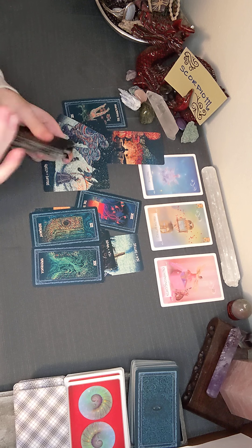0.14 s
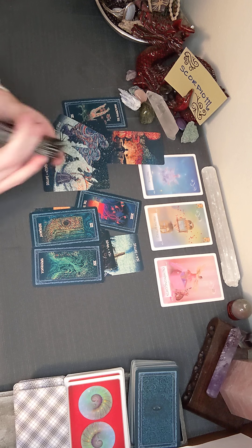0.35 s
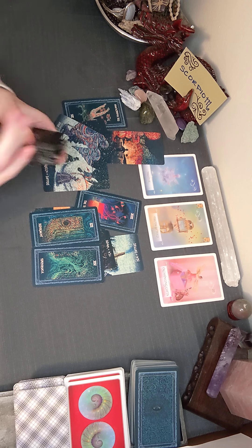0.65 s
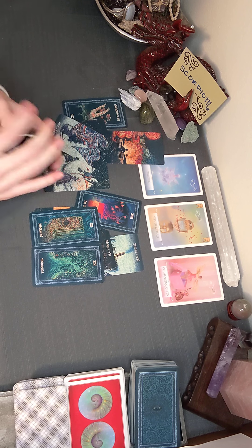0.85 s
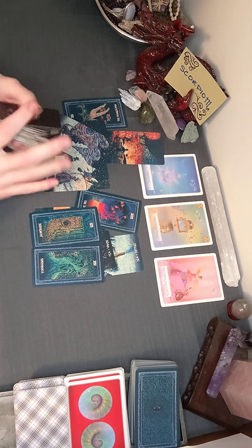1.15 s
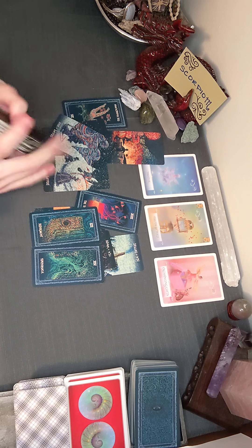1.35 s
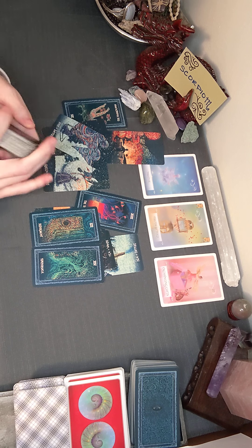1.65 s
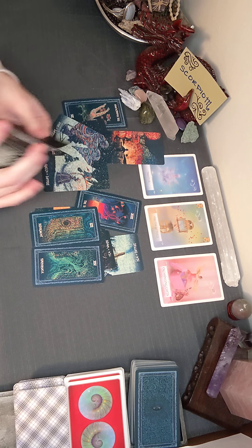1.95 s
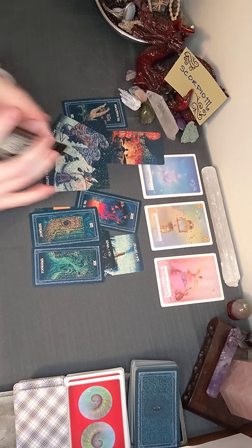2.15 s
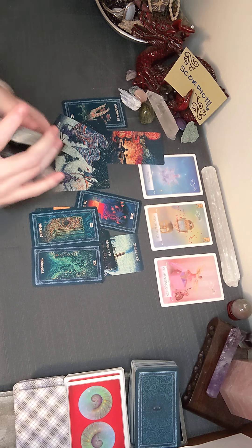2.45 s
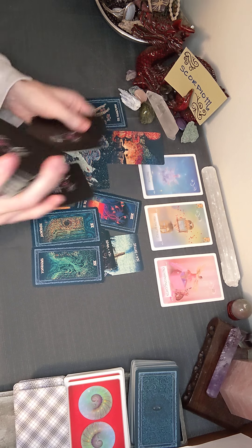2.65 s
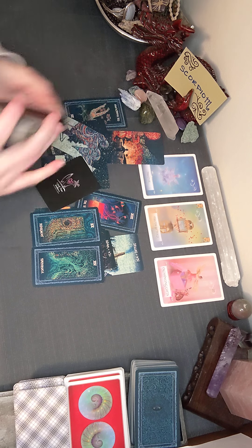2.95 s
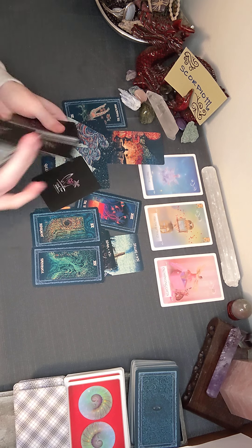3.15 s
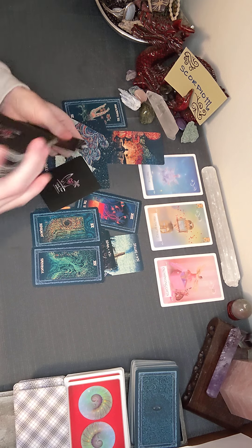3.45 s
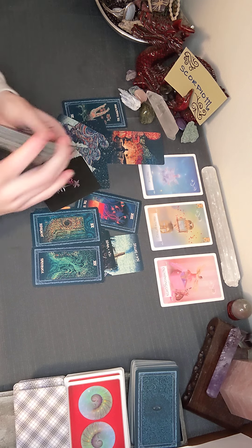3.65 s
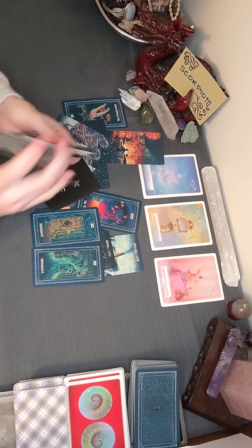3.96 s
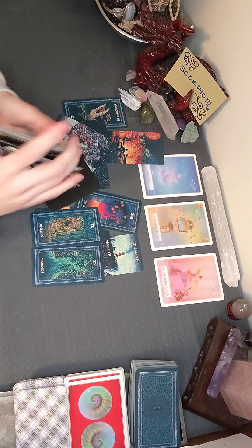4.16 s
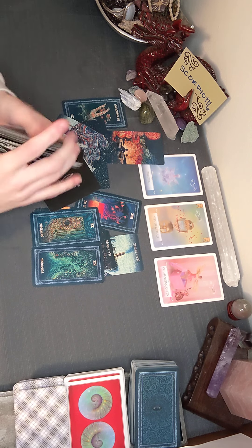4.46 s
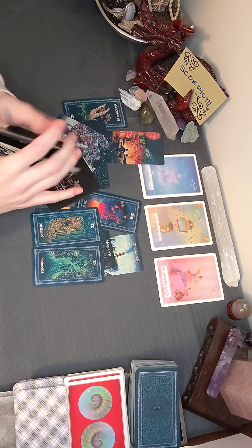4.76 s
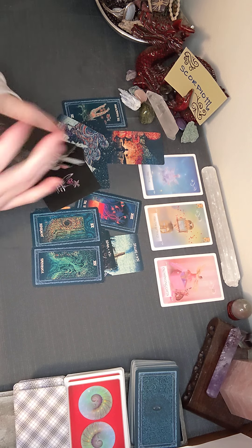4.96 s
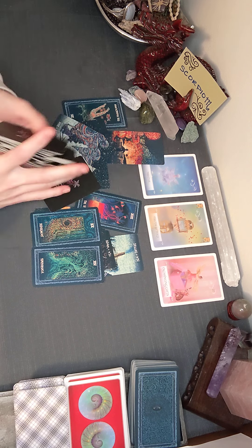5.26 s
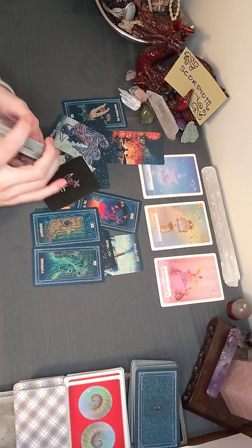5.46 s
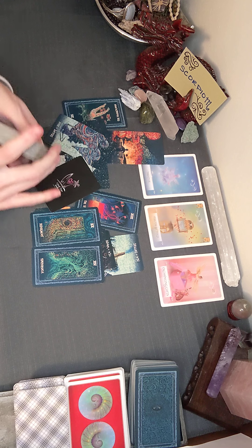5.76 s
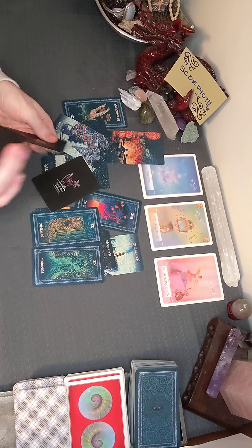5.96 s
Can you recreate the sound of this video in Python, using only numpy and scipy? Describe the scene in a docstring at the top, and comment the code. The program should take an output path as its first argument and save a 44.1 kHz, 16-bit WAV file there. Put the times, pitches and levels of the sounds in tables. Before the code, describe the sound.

A deck of large cards is shuffled overhand above a table, close to the microphone. Each stroke is a crisp click of edges, a short papery slide and a soft thump, about three or four a second. After five strokes the cards only shift lightly, then the shuffle resumes with louder snaps, slackens, and ends with one more landing. A faint rumble and hiss fill the small room.

```python
"""A quiet rumble fills a small room, where large cards are shuffled overhand above a cloth-covered table,
close to a phone. In each stroke, three or four a second, card edges first strike the deck and scrape;
then the faces glide with a fine friction hiss and a few catches; last the packet lands with a soft
thump, squeezing out the air. After five strokes the fingers pause and only shift the cards. The shuffle
resumes, slackens after five seconds, and ends with one more landing near six."""
import sys
import numpy as np
from scipy import signal
from scipy.fft import rfft, irfft
from scipy.io import wavfile
from scipy.ndimage import uniform_filter1d

SR = 44100
rng = np.random.default_rng(int(sys.argv[2]) if len(sys.argv) > 2 else 0)


def file_out(sig):
    """Save sig as 16-bit WAV at sys.argv[1]."""
    # one column per channel
    cols = np.atleast_2d(sig).T
    # limit, then scale
    lim = np.clip(cols, -1, 1)
    pcm = np.round(lim * 32767).astype(np.int16)
    wavfile.write(sys.argv[1], SR, pcm)


N = 269010
TIME = np.arange(N) / SR
FREQS = np.fft.rfftfreq(N, 1 / SR)
LEAD, SPAN = 1024, 8192  # samples before a contact, and in one whole contact


def undb(db):
    """Decibels to amplitude ratio."""
    return 10 ** (np.asarray(db) / 20)


def unit(x):
    """Normalisation to rms 1."""
    return x / np.sqrt(np.mean(x ** 2))


def colour(points):
    """Magnitude response through (frequency_hz, gain_db) points on a logarithmic frequency axis."""
    hz, db = np.transpose(points)
    return undb(np.interp(np.log(FREQS + 1), np.log(hz + 1), db))


def band(x, lo_hz, hi_hz, order=2):
    """Butterworth band-pass, applied to the spectrum."""
    n = x.shape[-1]
    hz = np.maximum(np.fft.rfftfreq(n, 1 / SR), 1)
    detune = 1j * (hz - lo_hz * hi_hz / hz) / (hi_hz - lo_hz)
    denominator = 1
    for pole in signal.buttap(order)[1]:
        denominator = denominator * (detune - pole)
    return irfft(rfft(x) / denominator, n)


def grit(rough_db, grain_samples=14, apart=1.0):
    """Stick-slip noise: its strength jumps as fibres catch and let go, partly coherent at two ports."""
    noise = rng.standard_normal((3, SPAN))
    grains = undb(rough_db * rng.standard_normal(SPAN // grain_samples + 1))
    strength = np.repeat(grains, grain_samples)[:SPAN]
    return unit(strength * (noise[0] + apart * noise[1:]))


def envelope(rise_ms, decay_ms):
    """Exponential growth and decay of a contact: time around its peak (s) and amplitude."""
    t = (np.arange(SPAN) - LEAD) / SR
    return t, np.exp(1000 * np.where(t < 0, t / rise_ms, -t / decay_ms))


def add(track, at_s, sound, env, db):
    """Superposition: mix in a sound with the energy of its envelope at a peak level of db."""
    start = int(at_s * SR) - LEAD
    part = track[:, start:start + SPAN]
    gain = undb(db) * np.sqrt(np.mean(env ** 2))
    part += gain * unit(sound)[..., :part.shape[1]]


def diffuse_noise(n, coherent_hz):
    """Spatial coherence of a diffuse field: long waves reach both microphone ports alike."""
    hz = np.fft.rfftfreq(n, 1 / SR)
    mid, side = rfft(rng.standard_normal((2, n)))
    apart = np.clip(hz / coherent_hz, .14, 1)
    return irfft((mid + np.array([[1], [-1]]) * apart * side) / np.sqrt(1 + apart ** 2), n)


# Spectrum of the room's still air: frequency_hz, relative_density_db
AIR_SPECTRUM = [(30, -20), (100, -5), (200, -0.5), (320, -17), (400, -15.5), (500, -10.5), (700, -22),
                (1500, -19.5), (3000, -21), (6500, -17), (10500, -19.5), (14000, -19.5), (16000, -26)]
# Course of the low rumble: time_s, level_db
RUMBLE_LEVELS = [(0, -59), (0.55, -61), (1.1, -69), (1.6, -69.5), (2.6, -70), (3.5, -70), (6.1, -70.5)]
def background(air_db):
    """Low noise: a faint, even hiss, under a rumble in the room's lowest mode that is strongest at the start
    and settles after about a second."""
    air = unit(irfft(rfft(diffuse_noise(N, 900)) * colour(AIR_SPECTRUM), N))
    mode = unit(band(diffuse_noise(N, 960), 61, 76))
    broad = unit(band(diffuse_noise(N, 900), 39, 100, order=3))
    rumble_db = np.interp(TIME, *np.transpose(RUMBLE_LEVELS))
    return undb(air_db) * air + undb(rumble_db) * unit(mode + 0.63 * broad)


def room(x, near_db, near_ms, wall_db, t60_low_s, t60_high_s):
    """Reverberation: bright early reflections from things on the table, then the walls' short ring."""
    t = np.arange(SR // 2) / SR
    near = band(diffuse_noise(len(t), 900), 1700, 17000) * np.exp(-1000 * t / near_ms) * (t > .001)
    tail = diffuse_noise(len(t), 1300) * np.clip(t / .014, 0, 1)
    low = band(tail, 130, 3800) * undb(-60 * t / t60_low_s)
    high = 0.15 * band(tail, 3800, 13000) * undb(-60 * t / t60_high_s)
    response = (undb(near_db) * unit(near) + undb(wall_db) * unit(low + high)) / np.sqrt(len(t))
    return signal.fftconvolve(x, response, axes=1)[:, :N]


# Balance of the two microphone ports: frequency_hz, left_minus_right_db
PORT_BALANCE = [(100, 1.5), (200, 2), (380, -3), (700, -8), (1290, -3), (2400, -1.5), (4400, -4.5),
                (8100, 5), (15000, -4)]
# Phase between the ports: frequency_hz, left_lead_rad
PORT_LEAD = [(0, 0), (700, .1), (1350, 3.1), (1750, 2.9), (2100, 1.4), (3000, 4.2), (4100, 4.2),
             (4900, 7.2), (6600, 9.1), (7800, 7.4), (9000, 10), (12500, 14.5), (16000, 17)]
def port_response():
    """Spaced receivers: direct sound reaches each port with its own level and phase."""
    tilt = np.sqrt(colour(PORT_BALANCE))
    lead = np.interp(FREQS, *np.transpose(PORT_LEAD))
    return np.array([tilt, np.exp(-1j * lead) / tilt])


# Colour of the card stock: frequency_hz, gain_db
CARD_STOCK = [(130, 8), (230, 0), (350, -4.5), (620, -5.5), (950, -0.5), (1250, 5), (1600, -2.5),
              (2200, 0.5), (3400, 1.5), (5000, -2), (7000, -1.5), (10500, -3), (13500, 3.5), (16000, -5)]
# Resonances of the deck held in the hand: frequency_hz, bandwidth_hz, gain_db
DECK_MODES = [(349.5, 41, 3), (466.3, 39, 3), (640.6, 72, 4.5), (875, 8.9, -25.5), (1126, 4, -12),
              (1910, 46, 0.5), (2400, 39, -1.5), (2660, 130, -9.5), (3600, 430, -8), (4670, 230, -7.5)]
def deck_response():
    """Modal superposition: the deck's damped resonances and its stock colour every contact."""
    modes = sum(undb(db) / (1 + 2j * (FREQS - hz) / width) for hz, width, db in DECK_MODES)
    return colour(CARD_STOCK) * (1 + modes)


def sliding(table, rub_db, hiss_db, drag_db, rough_db, steepness, low_hiss):
    """Sliding friction: a rasp from the fibres, a hiss from the coating, a dull drag in the packet."""
    out = np.zeros((2, N + 2 * SPAN))
    t = (np.arange(SPAN) - SPAN // 2) / SR
    for middle_s, length_ms, rub, hiss in table:
        speed = np.exp(-np.abs(2000 * t / length_ms) ** steepness)
        finger_pressure = undb(unit(uniform_filter1d(rng.standard_normal(SPAN), size=200)))
        fibres = grit(rough_db, grain_samples=30)
        rasp = unit(band(fibres, 1200, 8200))
        drag = undb(drag_db) * unit(band(fibres, 270, 1700))
        coating = grit(rough_db, grain_samples=20)
        fine = unit(band(coating, 11500, 19000) + low_hiss * band(coating, 6000, 11000, order=1))
        friction = undb(rub + rub_db) * (rasp + drag) + undb(hiss + hiss_db) * fine
        start = int(middle_s * SR) + SPAN // 2
        out[:, start:start + SPAN] += speed * finger_pressure * friction
    return out[:, SPAN:SPAN + N]


# One card dragged quickly across the others: middle_s, length_ms, rub_db, hiss_db
CARD_SWISHES = [(1.506, 57, -52.5, -55.5), (1.64, 54, -76, -62), (1.765, 38, -74, -62.5),
                (2.383, 20, -54, -42.5), (2.570, 50, -39.5, -38), (3.226, 19, -42.5, -47),
                (3.483, 23, -38, -50.5), (3.828, 23, -55, -40.5), (3.915, 66, -60.5, -57),
                (5.09, 22, -70.5, -61), (5.416, 25, -55.5, -40), (5.759, 40, -71, -58)]
# Lulls in which the fingers shift the cards: start_s, end_s
LULLS = [(1.42, 1.66), (5.3, 5.7)]
def handling(gap_s, length_ms, rub_db, hiss_db):
    """Light friction: single cards swish past, and in the lulls the deck shifts in uneven swells."""
    times = np.concatenate([np.arange(start, end, gap_s) for start, end in LULLS])
    shifts = [(s + 0.023 * late, length_ms, rub_db + 1.2 * firm, hiss_db + 4.5 * firm)
              for s, (late, firm) in zip(times, rng.standard_normal((len(times), 2)))]
    return sliding(CARD_SWISHES + shifts, rub_db=1.5, hiss_db=4.5, drag_db=-8,
                   rough_db=1.0, steepness=1.6, low_hiss=.9)


def squeak(middle_s, length_s, pitch_hz, rise_hz_per_s, width_hz, level_db):
    """Stick-slip oscillation: a lifted card gives one faint, rising squeak."""
    t = TIME - middle_s
    waver = unit(uniform_filter1d(rng.standard_normal(N), size=int(SR / width_hz)))
    tone = unit(waver * np.sin(2 * np.pi * (pitch_hz + rise_hz_per_s * t / 2) * t))
    return undb(level_db) * np.exp(-(2 * t / length_s) ** 2) * tone


# Hollow notes of the closing gap between two packets: start_s, pitch_hz, level_db, decay_ms
AIR_POCKETS = [(0.096, 660, -43, 1.3), (0.174, 1230, -39.5, 6.1), (2.075, 1700, -36, 2.4),
               (2.383, 674, -38, 7.9), (2.426, 895, -38.5, 12), (2.515, 613, -27.5, 9),
               (2.525, 1958, -22, 9.7), (2.53, 3150, -25.5, 9), (2.758, 2330, -31.5, 2.8),
               (3.127, 3500, -29.5, 2), (3.365, 2320, -24.5, 11), (3.500, 2900, -25.5, 3.8),
               (4.080, 2920, -29.5, 2.4), (4.372, 1210, -30.5, 2.4), (4.879, 760, -42, 5.1)]
def air_pockets(band_ratio, gain_db):
    """Cavity resonance: escaping air and rubbing edges ring the gap between two packets."""
    out = np.zeros((2, N))
    for start_s, pitch_hz, level_db, decay_ms in AIR_POCKETS:
        _, env = envelope(0.2, decay_ms)
        note = band(env * grit(1.4), pitch_hz / band_ratio, pitch_hz * band_ratio)
        add(out, start_s, note, env, level_db + gain_db)
    return out


def catches(glides, count, gain_db, spread_db):
    """Stick-slip transients: edges catch at random moments of a glide, each with its own pitch."""
    out = np.zeros((2, N))
    _, env = envelope(rise_ms=.52, decay_ms=1.6)
    for middle_s, length_ms, _, glide_db in glides:
        for when, force, pitch in rng.uniform(-1, 1, (count, 3)):
            hz = 3700 * 2 ** (.5 * pitch)
            at_s = middle_s + when * length_ms / 2000
            tick = band(env * grit(2.0), hz / np.sqrt(2), hz * np.sqrt(2), order=1)
            add(out, at_s, tick, env, glide_db + gain_db + spread_db * force)
    return out


def cracks(strikes):
    """A brief impulse has a broad spectrum: a packet's leading edge makes one dry, bright crack."""
    out = np.zeros((2, N))
    _, env = envelope(rise_ms=.2, decay_ms=.8)
    for start_s, level_db, _, tick_db, _ in strikes:
        crack = band(env * grit(2.0, apart=0.91), 2600, 19000, order=1)
        add(out, start_s, crack, env, level_db + .7 * tick_db)
    return out


def impacts(table, rise_ms, snap_db, thump_db, knock_db, knock_share, tick_db, rough_db,
            base_hz, octaves_per_db, flex_ms, rattle):
    """Impact excitation: many edges hit almost at once, and the packet flexes with a sinking thump."""
    out = np.zeros((2, N))
    for start_s, db, thump, tick, decay_ms in table:
        t, env = envelope(rise_ms, decay_ms)
        contacts = env * grit(rough_db)
        add(out, start_s, band(contacts, 2200, 7460, order=3), env, db + snap_db)
        add(out, start_s, band(contacts, 750, 2000, order=3), env, db + knock_share * thump + knock_db)
        _, tick_env = envelope(.76 * rise_ms, .76 * decay_ms)
        add(out, start_s, band(tick_env * grit(rough_db), 8500, 18500), tick_env, db + tick + tick_db)
        _, flex_env = envelope(3.45, flex_ms)
        flex_hz = base_hz * 2 ** (octaves_per_db * (db + thump + 42))  # heavier thumps start higher
        # Dispersion: short bending waves cross the packet first, long ones follow.
        pitch_hz = flex_hz * (.55 + .95 * np.exp(-np.maximum(t, 0) / .005))
        flex = unit(flex_env * np.sin(2 * np.pi * (np.cumsum(pitch_hz) / SR + rng.random())))
        loose = unit(band(flex_env * rng.standard_normal(SPAN), flex_hz / 1.88, flex_hz * 1.69))
        add(out, start_s + .003, flex + rattle * loose, flex_env, db + thump + thump_db)
    return out


# Stray edges that snap free or drop on the table: start_s, level_db, thump_db, tick_db, decay_ms
# In both tables, thumps and ticks are relative to the level of their impact.
STRAY_EDGES = [(0.096, -35.5, -6.5, -3, 4.6), (0.359, -41, -3, 2.5, 11), (0.655, -41, -13.5, -10, 4.7),
               (1.227, -34.5, -8, 3.5, 6.3), (2.286, -36.5, -10.5, -5, 6.6), (2.348, -37, -27.5, -8, 6),
               (2.422, -46, 2.5, -1, 6), (2.489, -44, -11.5, 3.5, 3), (2.513, -29.5, 4, -12, 12),
               (2.526, -27, -12.5, 0, 11), (2.532, -25, -15, -8, 9), (2.692, -45, 3.5, -3, 6.4),
               (2.758, -35, -19, -4.5, 4.6), (2.785, -51, -14.5, -1, 4.2), (2.838, -64, -17, -17, 4.8),
               (2.995, -70.5, 13, -9, 6.6), (3.127, -36, -24, -3, 3), (3.3745, -13.5, -31.5, -9, 3.4),
               (3.433, -40, -6.5, -1.5, 4.9), (3.691, -31.5, -18.5, -1.5, 3.3), (3.815, -54.5, -20, 20, 13),
               (4.067, -33.5, -20, -2, 2.4), (4.247, -43.5, -15.5, 0.5, 9.3), (4.579, -43, -5.5, -4, 8.4),
               (4.83, -50, -3.5, -1, 8), (4.851, -40, -8.5, -2, 8.2)]
# Strokes of the shuffle: start_s, landing_s, strike_db, thump_db, tick_db, decay_ms,
# scrape_db, glide_db, landing_db, landing_thump_db
SHUFFLE_STROKES = [(0.066, 0.175, -36.5, -6.5, 3.5, 7.6, -43, -49.5, -35.5, -6),
                   (0.346, 0.464, -32, -10.5, -1, 7.3, -54, -47, -37, -2.5),
                   (0.615, 0.719, -39, -6.5, 1.5, 5, -45, -47, -35, -0.5),
                   (0.892, 1.027, -61, 2.5, 15, 21, -43, -46.5, -35.5, -8.5),
                   (1.206, 1.294, -34.5, -7, 2.5, 5.1, -40.5, -55.5, -47.5, -32),
                   (1.964, 2.071, -79, -26, 19, 10, -59, -51, -35, -23),
                   (2.258, 2.381, -42.5, -5.5, 6.5, 14, -45, -41, -44, -2.5),
                   (2.497, 2.627, -20.5, -10, -2.5, 4.5, -39, -48, -47.5, -12),
                   (3.069, 3.23, -29.5, -24.5, 2.5, 2.1, -39, -46.5, -35.5, -20),
                   (3.3601, 3.504, -14, -36, -13, 4.2, -37.5, -48, -38, -7.5),
                   (3.664, 3.82, -34.5, -8, -1.5, 13.4, -44.5, -50, -59, -23),
                   (3.942, 4.077, -35, -20.5, -4.5, 4.2, -43.5, -47, -37, -20.5),
                   (4.255, 4.369, -34.5, -14.5, -0.5, 7.8, -54, -49.5, -33.5, -0.5),
                   (4.53, 4.652, -27, -13.5, 6.5, 2.7, -40.5, -47.5, -38.5, -12.5),
                   (4.8413, 4.901, -28, -19.5, -2, 2.1, -55.5, -51, -37.5, -9),
                   (5.1303, 5.151, -43, -9, 10, 6.5, -53, -38, -44.5, -28.5),
                   (5.376, 5.489, -60.5, -23, -2, 12, -67, -51, -54.5, -32.5),
                   (5.91, 5.992, -61.5, -14, 10.5, 51, -62, -56.5, -36.5, -16.5)]
def shuffle():
    """Impact and friction in turn: a packet brushes in, strikes, scrapes, glides and lands flat."""
    approaches, strikes, scrapes, glides, landings = [], [], [], [], []
    for (start_s, landing_s, strike_db, thump_db, tick_db, decay_ms,
         scrape_db, glide_db, landing_db, landing_thump_db) in SHUFFLE_STROKES:
        length_s = landing_s - start_s
        approaches.append((start_s - .098, 100, -68.5, -72.5))
        strikes.append((start_s, strike_db, thump_db, tick_db, decay_ms))
        scrapes.append((start_s + .027, 46.6, scrape_db, scrape_db - 2.4))  # the edge still digs in
        # The glide fills the last two thirds of the stroke and is mostly hiss.
        glides.append((start_s + .64 * length_s, .66 * 1000 * length_s, glide_db - 12, glide_db))
        landings.append((landing_s, landing_db, landing_thump_db, 0, 3.34))
    edges = impacts(strikes + STRAY_EDGES, rise_ms=.7, snap_db=2.5, thump_db=3.5,
                    knock_db=-1.5, knock_share=0.51, tick_db=2.5, rough_db=4.5,
                    base_hz=439.8, octaves_per_db=0.03, flex_ms=6.5, rattle=3.4)
    flats = impacts(landings, rise_ms=3.2, snap_db=-0.5, thump_db=1.0,
                    knock_db=-1.5, knock_share=0.35, tick_db=-0.5, rough_db=-0.5,
                    base_hz=345.9, octaves_per_db=0.06, flex_ms=9.8, rattle=1.0)
    scraping = sliding(approaches + scrapes, rub_db=-2.0, hiss_db=2.5, drag_db=-7.0,
                       rough_db=4.0, steepness=1.8, low_hiss=.55)
    gliding = sliding(glides, rub_db=0.2, hiss_db=2.0, drag_db=-8.5,
                      rough_db=2.5, steepness=2.3, low_hiss=.73)
    clicks = cracks(strikes) + catches(glides, count=3, gain_db=-1, spread_db=3.0)
    return edges + flats + scraping + gliding + clicks


def scene():
    """Source, filter and path: the cards sound through the deck and arrive directly and by the room."""
    cards = shuffle()
    cards += handling(gap_s=.05, length_ms=52, rub_db=-70.5, hiss_db=-63.5)
    cards += air_pockets(band_ratio=1.22, gain_db=1.0)
    cards += squeak(middle_s=.29, length_s=.09, pitch_hz=2130, rise_hz_per_s=5000,
                    width_hz=400, level_db=-67)
    direct = irfft(rfft(cards) * deck_response() * port_response(), N) * undb(-3.0)
    echoes = room(direct, near_db=-5.0, near_ms=11.0, wall_db=-22, t60_low_s=0.21, t60_high_s=0.28)
    return background(air_db=-71.5) + echoes + direct


def record(dry):
    """Band limiting: the phone's steep low-pass cuts the treble above 16.1 kHz."""
    return signal.sosfilt(signal.ellip(10, .2, 80, 16100, fs=SR, output="sos"), dry)


dry = scene()
out = record(dry)
file_out(out)
```